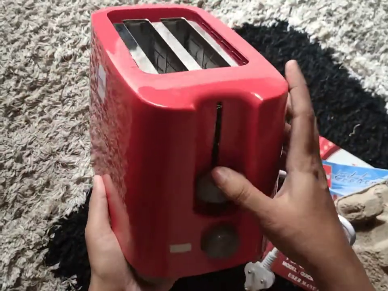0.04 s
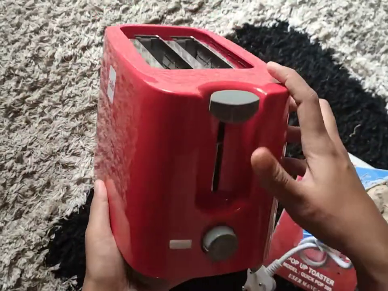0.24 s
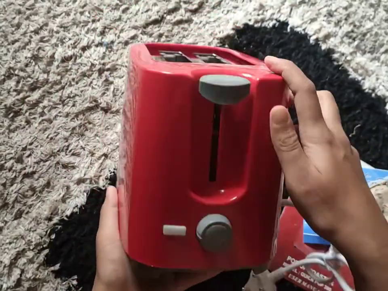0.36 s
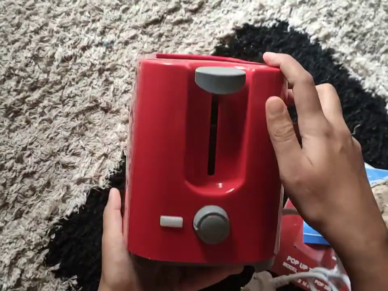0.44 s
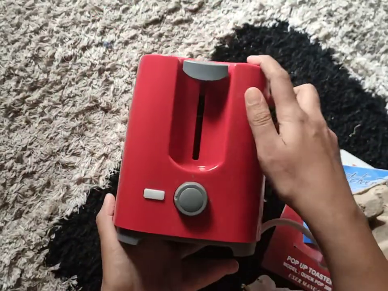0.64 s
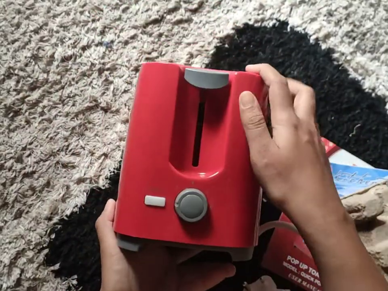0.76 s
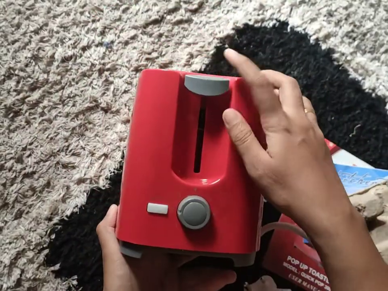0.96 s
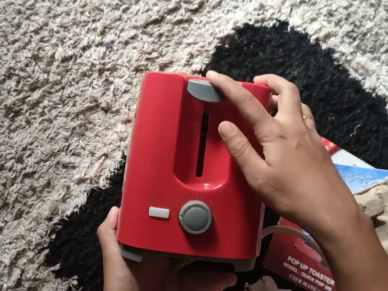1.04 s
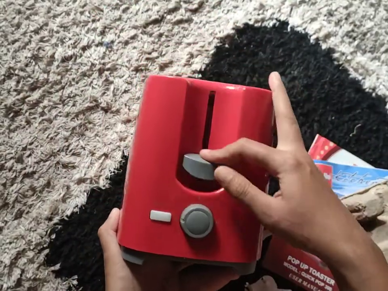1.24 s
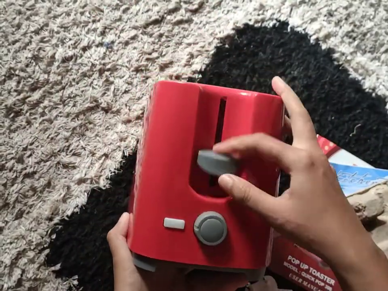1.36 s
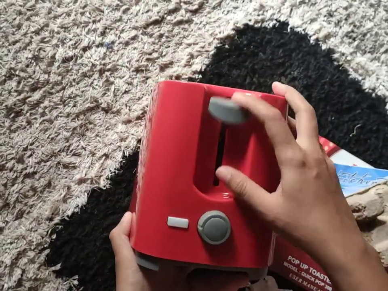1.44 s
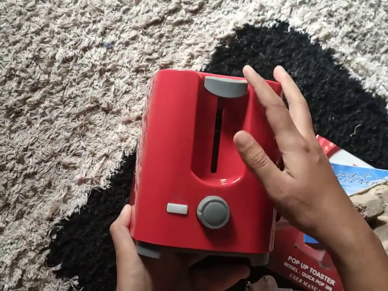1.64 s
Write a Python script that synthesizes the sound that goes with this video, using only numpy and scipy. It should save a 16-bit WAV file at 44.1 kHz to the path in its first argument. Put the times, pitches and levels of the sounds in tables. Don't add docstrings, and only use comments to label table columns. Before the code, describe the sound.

A toaster lever scrapes upward and slams into its top stop with a loud bouncing clack, then after a pause is pressed down to a softer steel clatter and slid back up, close in a small hard room.

```python
import sys
import numpy as np
from scipy import signal
from scipy.fft import rfft, irfft, next_fast_len
from scipy.io import wavfile
from scipy.ndimage import map_coordinates

SR = 44100
rng = np.random.default_rng(int(sys.argv[2]) if len(sys.argv) > 2 else 0)


def ratio_of_db(decibels):
    return 10 ** (np.asarray(decibels, float) / 20)


def wrap_up_sound(samples):
    columns = np.atleast_2d(samples).T
    tamed = np.clip(columns, -1, 1)
    steps = np.round(tamed * 32767).astype(np.int16)
    wavfile.write(sys.argv[1], SR, steps)


N = 74970
LEAD = 4410

# (frequency [Hz], density [dB per Hz])
AIR_SPECTRUM = [(59, -54), (100, -14), (135, -13), (276, -5.5), (490, -15), (832, -17), (1100, -13.5),
                (2450, -10), (15800, -32.5)]
# (frequency [Hz], width [Hz], level [dB])
FAN_BANDS = [(242, 165, 8.5), (836, 96, 15.5), (495, 340, -5)]
# (frequency [Hz], density [dB per Hz])
RUMBLE_SPECTRUM = [(15, -11), (40, -1.5), (90, -2), (160, -14), (300, -47)]
# (frequency [Hz], correlation [-1 to 1])
ALIKE_AIR = [(60, 0.47), (240, 1), (950, 0.37), (3770, -0.015), (15000, -0.024)]
ALIKE_ROOM = [(150, .97), (500, 0.86), (1200, 0), (3000, 0)]
ALIKE_NEAR = [(60, 0.63), (240, 1), (950, 0.77), (3770, 0.047), (15000, 0.025)]
# (frequency [Hz], t60 [s])
ROOM_T60 = [(150, 0.31), (600, 0.34), (2000, 0.35), (6000, 0.34), (14000, 0.32)]
# (frequency [Hz], left over right [dB])
LEAN = [(60, 8), (130, -1), (290, 2.5), (640, 0), (1410, -5.5), (3100, -2), (6820, -4.5), (15000, -5)]
# (frequency [Hz], width [Hz], level [dB])
PORT_LEFT = [(6830, 460, 1), (8540, 650, 9), (9900, 260, -2), (12860, 930, -4.5), (16500, 230, -13.5)]
PORT_RIGHT = [(2230, 140, 2.5), (5140, 2310, 4.5), (6910, 590, -6), (10280, 1860, -11), (12600, 330, -12),
              (16000, 650, -7)]
# (time [s], click level [dB], knock frequency [Hz], knock level [dB], knock t60 [s])
TICKS = [(.1425, -55, 556.4, -38, 0.11), (0.158, -35, 5640, -46, .03), (.207, -55, 1090, -38.5, 0.032),
         (0.2866, -52, 1990, -43, 0.0075), (0.796, -43.5, 970, -52.5, 0.028),
         (1.0031, -41.5, 2320, -48, 0.031), (1.1244, -40, 1070, -33, .016), (1.128, -40, 520, -43, .03),
         (1.5682, -22, 4200, -39, .02), (1.5708, -29, 1500, -35, .015), (1.5686, -34, 15100, -36, .02),
         (1.5828, -29, 520, -42, .03), (1.5853, -32, 8500, -44, .02), (1.603, -36, 800, -44, .02),
         (1.464, -60, 370, -38, .05), (1.2233, -37, 945, -42.5, 0.22), (1.253, -34, 1880, -33.5, 0.065),
         (1.4591, -45, 4040, -49, 0.043), (1.528, -41, 1690, -43, 0.016)]
# (frequency [Hz], density [dB per Hz])
CLICK_SPECTRUM = [(150, -25), (500, 2), (2000, -5), (5000, 2), (9000, -0.5), (12000, -4), (15800, -1.5)]
# (time [s], rubbing level [dB], hollow ring level over the rubbing [dB])
SPRING_UP = [
    (.140, -67, 14),
    (.146, -62, 9),
    (.157, -53.5, 6),
    (.161, -43, -8),
    (.200, -47.5, -12),
    (.222, -37, -26),
    (.236, -41.5, -22),
    (.240, -75, -12),
]
PRESS_DOWN = [
    (1.125, -46, -7),
    (1.140, -68, 0),
    (1.180, -53, 1.5),
    (1.218, -59.5, 5),
    (1.228, -42, -23),
    (1.256, -41.5, -5.5),
    (1.275, -44.5, -4.5),
    (1.288, -44, -2),
    (1.300, -79, -4),
]
EASE_UP = [
    (1.435, -74, -2),
    (1.448, -66, 0),
    (1.464, -41.5, -15),
    (1.485, -46.5, -22),
    (1.500, -47, -7),
    (1.545, -47.5, -1.5),
    (1.566, -43.5, -26),
    (1.590, -40, -11),
    (1.625, -60.5, -22),
]
# (frequency [Hz], density [dB per Hz])
RUB_UP = [(150, -57), (250, -32), (546, -21), (759, -1), (951, -13), (2000, 0), (2510, -7.5), (5580, -1),
          (15800, -14.5)]
RUB_DOWN = [(150, -39), (250, -8), (595, -13.5), (918, -16), (1250, -7.5), (1870, -11), (3090, -11),
            (4230, -13.5), (15800, -27)]
RUB_EASE = [(150, -41), (250, -33), (934, -9), (1350, -10), (2000, -8), (3490, -9), (4010, -7.5),
            (8760, -10.5), (15800, -25)]
# (frequency [Hz], width [Hz], level [dB])
SLOT_UP = [(553, 320, -3.5), (1000, 46, -7)]
SLOT_DOWN = [(960, 116, 5), (1880, 120, -7.5)]
SLOT_EASE = [(327, 370, -10), (902, 59, 1.5), (2060, 38, -6)]
# (frequency [Hz], level [dB], t60 [s])
SHELL_MODES = [(198, -17, 0.078), (282, -11.5, 0.084), (418, -5.5, 0.052), (552.6, -2.5, 0.081),
               (596, -4.5, .07), (894, -6.5, 0.16), (956, 4, 0.055), (1060, -5.5, 0.036), (1268, -6, 0.021),
               (1615, -6, 0.013), (1914, 3.5, 0.04), (2164, 1.5, 0.021), (2300, -1, 0.033),
               (5135, -2, 0.023)]
STEEL_MODES = [(300, -11, .04), (440, -7, .035), (1580, -6, .025), (1990, 3, .024), (2420, 3, .022),
               (4300, -8, .03), (5970, -8, .07), (6440, -8, .1), (7310, -12, .05), (8520, -12, .12),
               (9640, -9, .08), (11480, -9, .07), (12480, -9, .05), (14300, -10, .1)]
# (frequency [Hz], density [dB per Hz])
TOP_CRACK = [(71, -43), (120, -4.5), (983, -10), (1230, -6), (2320, -13), (2900, -9), (5140, -13.5),
             (8560, -11.5), (15800, -18.5)]
BOTTOM_CRACK = [(71, -59), (120, -1), (944, -5), (1090, -9), (2010, -2), (7270, -2), (8390, -2),
                (10300, -2.5), (15800, -5.5)]
# (crack level [dB], crack t60 [s], loose-parts level [dB], loose-parts t60 [s])
TOP_RATTLE = (-1.5, 0.0584, -2.5, 0.1949)
BOTTOM_RATTLE = (4, 0.0764, -10, 0.71)
# (time [s], peak level [dB], shell ring level [dB])
TOP_HITS = [
    (.2383, -11.5, 3.5),
    (.2396, -15.5, -7),
    (.2412, -19, -1.5),
    (.2440, -22, -7),
    (.2475, -19, -15),
    (.2510, -17.5, -6.5),
    (.2565, -23.5, -1.5),
    (.2590, -22.5, -23),
    (.2655, -24, -24),
    (.2735, -31.5, -22),
]
# (time [s], peak level [dB], steel ring level [dB])
BOTTOM_HITS = [(-.045, -22, 0), (1.2922, -35, -16), (1.2966, -30, -12), (1.2993, -22, 2), (1.3020, -21, 1),
               (1.3048, -22.5, -1), (1.3115, -23.5, -10), (1.3144, -25, -10), (1.3205, -28, -14),
               (1.3290, -30, -14), (1.3340, -27, -12)]


def unit(x):
    return x / np.sqrt(np.mean(x ** 2) + 1e-20)


def along(points, hz):
    f, v = np.transpose(points)
    return np.interp(np.log(hz + 1), np.log(f + 1), v)


def filtered(x, response):
    m = next_fast_len(x.shape[-1] + 8192)
    spectrum = rfft(x, m) * response(np.fft.rfftfreq(m, 1 / SR))
    return irfft(spectrum, m)[..., :x.shape[-1]]


def resonances(peaks):
    def response(f):
        return sum((-1) ** k * ratio_of_db(db) * 1j * f * width / (hz * hz - f * f + 1j * f * width)
                   for k, (hz, width, db) in enumerate(peaks))
    return response


def wobble(rate, size):
    knots = rng.standard_normal(int(size * rate / SR) + 4)
    return map_coordinates(knots, [np.arange(size) * rate / SR])


def streaky(colour):
    spacing_hz, depth_db, peak_limit = 130, 4, .6
    knots = rng.standard_normal(int(SR / spacing_hz))

    def gain(f):
        streaks = np.minimum(map_coordinates(knots, [f / spacing_hz]), peak_limit)
        toward_treble = np.clip(f / 3500, 0, 2)
        return ratio_of_db(along(colour, f) + depth_db * toward_treble * streaks)
    return gain


def hiss(size, gain, alike):
    def mid_side_gain(hz):
        turn = np.arccos(np.clip(along(alike, hz), -1, 1)) / 2
        return gain(hz) * [np.cos(turn), np.sin(turn)]
    mid, side = filtered(rng.standard_normal((2, size)), mid_side_gain)
    return unit(np.array([mid + side, mid - side]))


def leaning(pair):
    return filtered(pair, lambda hz: ratio_of_db(along(LEAN, hz) * np.array([[.5], [-.5]])))


def handling():
    level_db = -75.5 + 4 * wobble(18, N)
    return ratio_of_db(level_db) * hiss(N, lambda f: ratio_of_db(along(RUMBLE_SPECTRUM, f)), [(50, 0.45)])


def air():
    colour = lambda f: ratio_of_db(along(AIR_SPECTRUM, f)) * (1 + np.abs(resonances(FAN_BANDS)(f)))
    drift_db = .4 * wobble(5, N) + .6 * wobble(30, N)
    return ratio_of_db(-50.5 + drift_db) * hiss(N, colour, ALIKE_AIR)


def room(x):
    level_db, delay_s = -6.5, 0.0087
    hz, t, z = signal.stft(hiss(SR // 2, np.ones_like, ALIKE_ROOM), SR, nperseg=256)
    decay = ratio_of_db(-60 * t / along(ROOM_T60, hz)[:, None])
    tail = signal.istft(z * decay, SR, nperseg=256)[1]
    tail *= 1 - np.exp(-np.arange(tail.shape[1]) / (delay_s * SR))
    wet = signal.fftconvolve(x, tail / np.linalg.norm(tail[0]), axes=1)[:, :x.shape[1]]
    return ratio_of_db(level_db) * wet


def clicks():
    click_t60_s, knock_rise_s = .022, .0003
    out = np.zeros((2, LEAD + N + SR))
    t = np.arange(SR // 4) / SR
    for s, db, hz, knock_db, t60 in TICKS:
        knock = ratio_of_db(knock_db - 60 * t / t60) * np.sin(2 * np.pi * hz * t)
        knock *= 1 - np.exp(-t / knock_rise_s)
        click_db = db - 6.5 - 60 * t / click_t60_s + 0.62 * wobble(630, len(t))
        click = ratio_of_db(click_db) * hiss(len(t), streaky(CLICK_SPECTRUM), ALIKE_NEAR)
        out[:, LEAD + round(s * SR):][:, :len(t)] += knock + click
    return out[:, :LEAD + N]


def travel(rows, colour, slot):
    grit_db, grit_per_s = 1.8, 300
    time = (np.arange(LEAD + N) - LEAD) / SR
    s, *levels = np.transpose(rows)
    rub_db, ring_db = (np.interp(time, s, level, left=-120, right=-120) for level in levels)
    grit = ratio_of_db(rub_db + grit_db * wobble(grit_per_s, LEAD + N))
    rub = hiss(LEAD + N, streaky(colour), ALIKE_NEAR)
    hollow = hiss(LEAD + N, resonances(slot), ALIKE_NEAR)
    return grit * (rub + ratio_of_db(ring_db) * hollow)


def blows(hits, modes, colour, rattle):
    out = np.zeros((2, LEAD + N + SR))
    t = np.arange(SR // 3) / SR
    crack_db, crack_s, loose_db, loose_s = rattle
    timbre = streaky(colour)
    sign = (-1.) ** np.arange(len(modes))[:, None]
    hz, level_db, t60 = np.transpose(modes)[..., None]
    for s, db, ring_db in hits:
        unlike = 1 - np.clip(along(ALIKE_NEAR, hz), 0, 1)
        side = np.pi * unlike * rng.uniform(-0.38, 0.38, hz.shape)
        mode_db = level_db - 11.0 + ring_db + rng.standard_normal(hz.shape)
        size = sign * ratio_of_db(mode_db - 60 * t / t60)
        ring = np.array([(size * np.sin(2 * np.pi * hz * t + k * side)).sum(0) for k in (1, -1)])
        ring *= 1 - np.exp(-t / 0.0003)
        crack = ratio_of_db(crack_db - 8.5 - 60 * t / crack_s)
        loose = ratio_of_db(loose_db - 16.0 - 60 * t / loose_s + 0.53 * wobble(225, len(t)))
        noise = hiss(len(t), timbre, ALIKE_NEAR) * (crack + loose) * (1 - np.exp(-t / 0.00028))
        out[:, LEAD + round(s * SR):][:, :len(t)] += ratio_of_db(db) * (ring + noise)
    return out[:, :LEAD + N]


def scene():
    rubbing = travel(SPRING_UP, RUB_UP, SLOT_UP)
    rubbing += travel(PRESS_DOWN, RUB_DOWN, SLOT_DOWN)
    rubbing += travel(EASE_UP, RUB_EASE, SLOT_EASE)
    top_slam = blows(TOP_HITS, SHELL_MODES, TOP_CRACK, TOP_RATTLE)
    bottom_clatter = blows(BOTTOM_HITS, STEEL_MODES, BOTTOM_CRACK, BOTTOM_RATTLE)
    parts = [top_slam, bottom_clatter, clicks(), rubbing]
    return sum(leaning(p) + room(p) for p in parts)[:, LEAD:] + air()


def roll_off(x):
    return signal.sosfilt(signal.butter(12, 15700, fs=SR, output="sos"), x)


def record(dry):
    low_cut_hz, top_hz = 140, 15720

    def port(bumps, f):
        return ratio_of_db(sum(db * np.exp(-((f - hz) / width) ** 2) for hz, width, db in bumps))

    def response(f):
        ports = np.array([port(PORT_LEFT, f), port(PORT_RIGHT, f)])
        low_cut = (1j * f / (low_cut_hz + 1j * f)) ** 3
        return ports * low_cut * (f < top_hz)
    mix = filtered(dry, response) + handling()
    return roll_off(mix)


dry = scene()
out = record(dry)
wrap_up_sound(out)
```